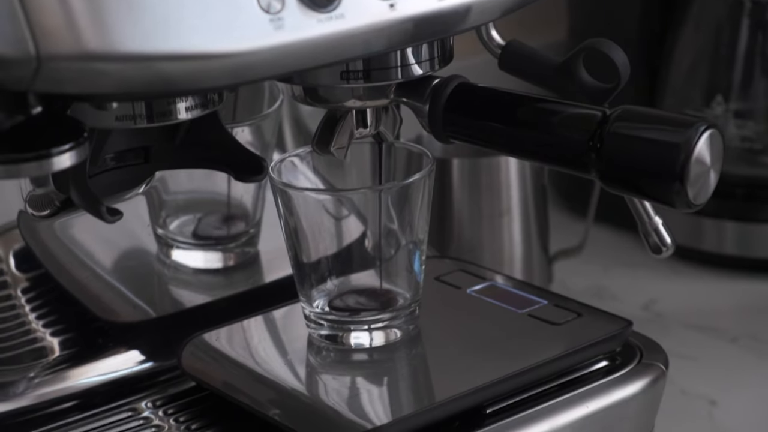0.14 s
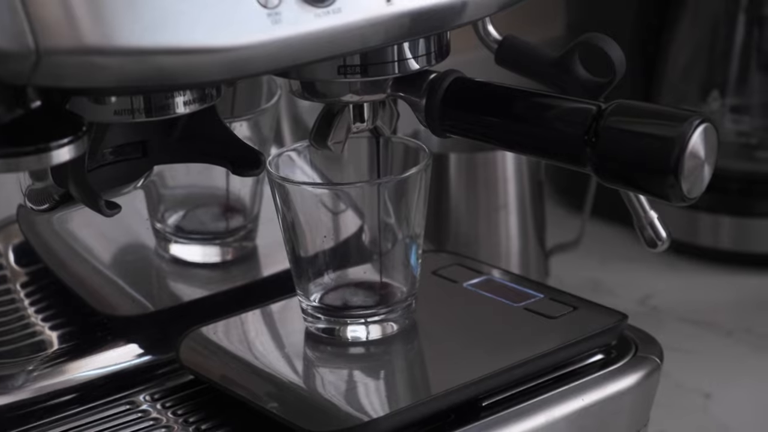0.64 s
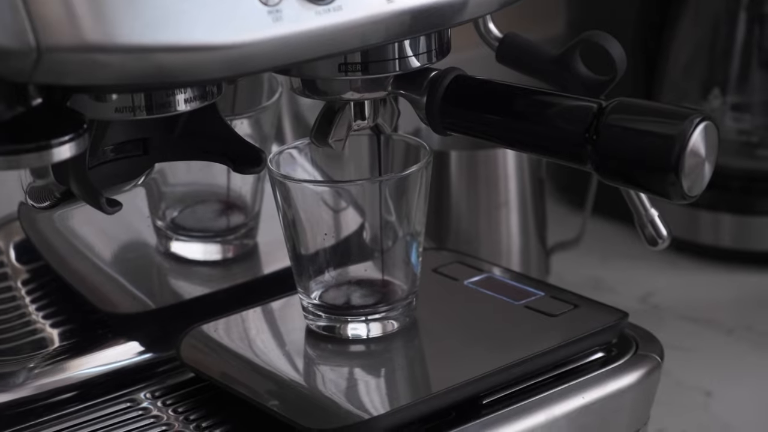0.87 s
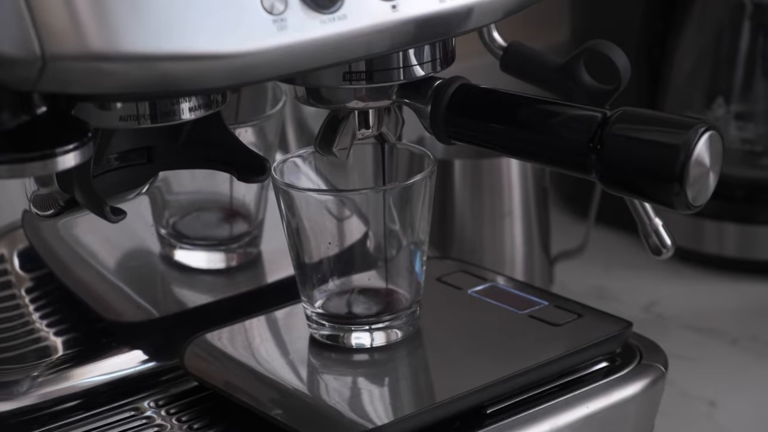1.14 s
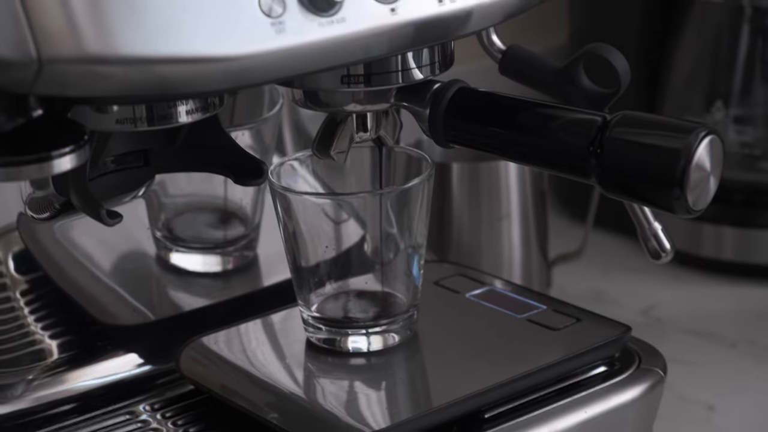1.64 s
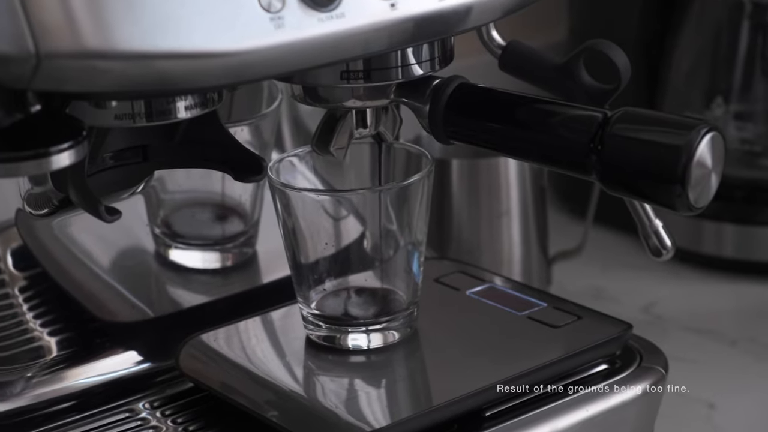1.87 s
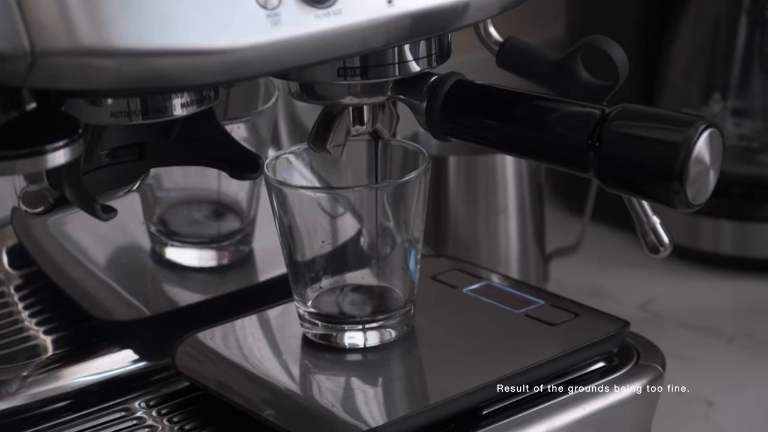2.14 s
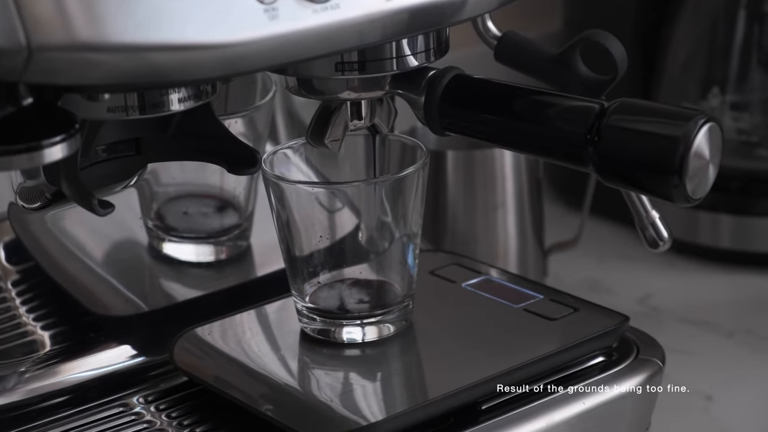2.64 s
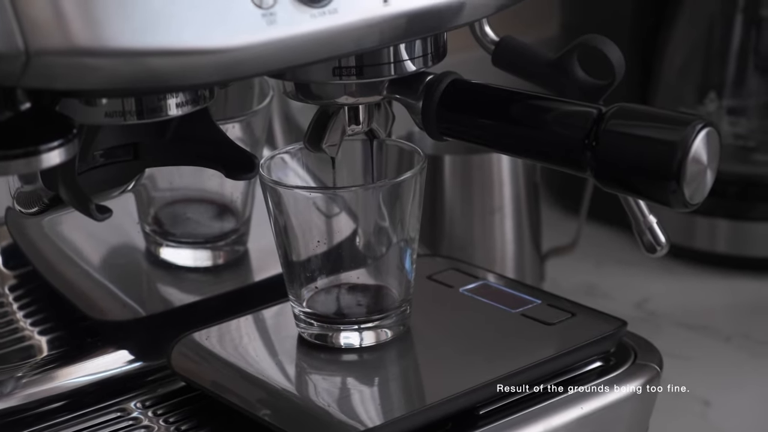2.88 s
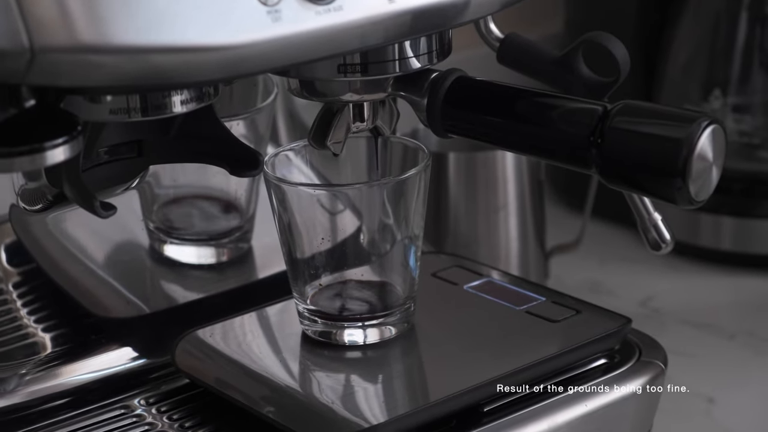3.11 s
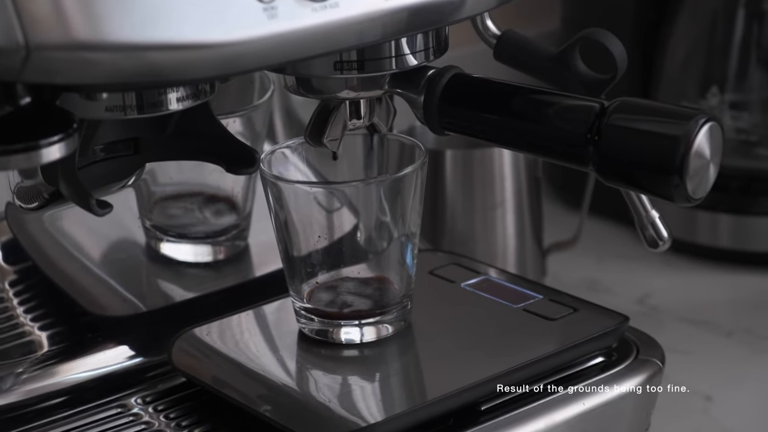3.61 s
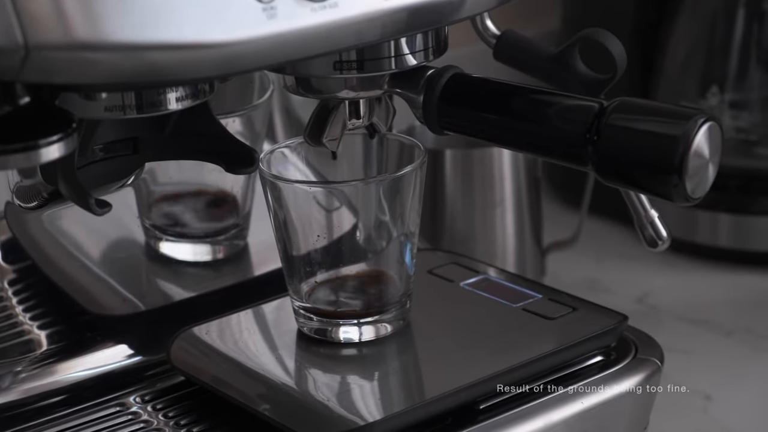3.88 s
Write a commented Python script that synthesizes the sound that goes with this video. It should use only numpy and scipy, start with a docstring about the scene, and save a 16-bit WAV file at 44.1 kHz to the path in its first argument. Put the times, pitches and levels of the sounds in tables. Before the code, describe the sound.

An espresso machine pump buzzes continuously at close range in a kitchen, its metal housing rattling; the tone flickers duller and fuller early, then settles, with faint pulsing hiss and a few glassy drip ticks after two seconds.

```python
"""A buzz at the mains rate: an espresso machine's vibrating pump, strokes ringing the metal housing.
Summed multiples of the stroke rate; early on they flip a few times between a duller and a fuller tone.
Water rushes and hisses: coloured noise, patchy in the middle, its treble puffing with each stroke.
Coffee drips into a glass (rising blips with echoes); brief fizzes (swept noise) climb in the treble.
The machine stands nearer the right microphone."""
import sys
import numpy as np
from scipy import signal
from scipy.fft import rfft, irfft
from scipy.io import wavfile

SR = 44100
rng = np.random.default_rng(int(sys.argv[2]) if len(sys.argv) > 2 else 0)


def boost_factor(decibels):
    """Convert a level in decibels to a linear amplitude factor."""
    exponent = np.asarray(decibels, float) / 20
    return 10 ** exponent


def digitize_waveform(pressure):
    """Quantize a signal to 16-bit integers and store it at the path in sys.argv[1].

    Rows of a 2-D input are taken as channels; values are limited to [-1, 1].
    """
    field = np.atleast_2d(pressure).T
    bounded = np.clip(field, -1, 1)
    quanta = np.round(bounded * 32767).astype(np.int16)
    wavfile.write(sys.argv[1], SR, quanta)


N = 176400

MAINS_HZ = 60.003
STROKE_S = 0.00966  # moment in the cycle when water is pushed

# Buzz fullness, read relative to FULL_REF_DB: (time [s], level [dB])
FULLNESS = [(0.0, -37.5), (0.02, -37), (0.26, -37), (0.29, -33.5), (0.41, -38.5), (0.52, -39), (0.59, -34),
            (0.9, -34), (0.95, -36), (1.0, -37), (1.06, -34), (1.16, -33.5), (1.53, -35), (2.31, -32.5),
            (2.35, -33.5), (3.23, -33), (3.41, -34), (3.92, -33), (4.0, -34.5)]
FULL_REF_DB, DRIFT_MID_S = -34.2, 2.5
# Multiples of the stroke rate; rms levels at FULL_REF_DB and DRIFT_MID_S:
# (multiple, left [dB], right [dB], left phase lead [rad], follow [dB per dB fullness], drift [dB/s])
ORDERS = [(1, -63, -59, 0.3, 0.2, 0.2), (2, -53, -52, -0.1, -0.1, 0.2), (3, -48, -46, -0.2, 0.0, 0.3),
          (4, -54, -55, -0.2, 0.3, 0.2), (5, -49, -47, -0.4, 0.1, 0.1), (6, -40, -42, -0.9, -0.1, 0.4),
          (7, -47, -48, -0.2, 0.2, 0.3), (8, -39, -36, -0.4, -0.2, -0.3), (9, -44, -42, -0.0, 0.1, 0.8),
          (10, -44, -41, -0.1, -0.3, -0.7), (11, -32, -32, -0.1, 1.0, 0.0),
          (12, -49, -51, -1.2, -0.0, -0.2), (13, -50, -51, -0.2, 0.1, 0.5), (14, -61, -61, -0.8, -0.8, 1.1),
          (15, -57, -52, -1.6, -0.1, 0.8), (16, -58, -55, 1.7, 0.6, -0.2), (17, -57, -54, -0.8, 0.2, 0.1),
          (18, -67, -59, 2.1, -1.3, -0.1), (19, -57, -44, -0.3, 0.1, -0.3), (20, -63, -49, -0.3, 1.2, -0.2),
          (21, -62, -51, 0.3, -0.9, 0.3), (22, -52, -47, 0.6, 0.4, 1.5), (23, -63, -65, 0.2, -1.1, 0.4),
          (24, -55, -60, 1.0, 1.0, 0.0), (25, -64, -54, 0.2, -1.0, 0.3), (26, -51, -42, 0.8, 1.1, 0.9),
          (27, -68, -51, 2.6, -0.3, -0.6), (28, -68, -64, 0.4, -0.9, 0.3), (29, -60, -62, -0.4, -0.5, -0.6),
          (30, -54, -54, 0.1, 0.7, -1.2), (31, -60, -60, -0.1, 0.3, -0.2), (32, -71, -64, 2.1, -0.4, 1.3),
          (33, -67, -59, 0.0, 2.0, -0.4), (34, -72, -62, 1.7, 0.5, -0.7), (35, -63, -59, -0.1, 0.4, -0.5),
          (36, -62, -58, -0.6, -0.4, 0.1), (37, -64, -57, -0.4, 0.3, 0.3), (38, -70, -64, 0.6, -0.9, 1.1),
          (39, -66, -65, -1.1, 0.0, 0.4), (40, -64, -68, -1.0, -0.3, -0.1), (41, -69, -79, -1.1, -0.9, 0.3),
          (42, -69, -61, 2.4, 0.2, -0.1), (43, -69, -67, 1.1, -0.4, -1.1), (44, -68, -62, -0.1, 0.4, -0.7),
          (45, -68, -75, 1.9, -0.3, 0.3), (46, -64, -59, -0.3, 1.4, 0.9), (47, -72, -67, 1.9, -0.7, 0.2),
          (48, -69, -69, 2.5, 0.0, 0.3), (49, -71, -65, -1.5, 0.5, -0.1), (50, -69, -69, 1.8, 0.2, -0.5),
          (51, -75, -65, -0.3, 0.9, 0.4), (52, -71, -68, 0.5, 0.1, -0.2), (53, -83, -66, -1.7, 1.3, -0.4),
          (54, -75, -67, -1.7, -0.1, 0.2), (55, -75, -67, 0.8, 0.4, -1.4), (56, -66, -60, 1.0, 0.6, 0.1),
          (57, -67, -74, 0.3, 0.6, -0.3), (58, -66, -62, 0.7, 0.6, 0.3), (59, -78, -70, 1.1, 0.8, -1.7),
          (60, -74, -66, 2.8, 0.6, -0.1), (61, -77, -74, -2.9, -0.4, 1.2), (64, -78, -83, -0.2, 0.0, 0.1),
          (67, -74, -76, -0.8, 0.5, 0.6), (68, -83, -76, -0.2, 0.3, -1.0), (69, -89, -75, -1.6, 0.4, 0.4),
          (71, -81, -78, -1.0, 0.5, 0.2), (72, -78, -78, -0.7, 0.2, -1.8), (73, -76, -66, -0.2, 2.0, -3.0),
          (74, -79, -76, 0.3, 1.0, -1.4), (75, -77, -70, -1.2, 1.0, -1.2), (76, -77, -63, 1.4, 2.3, -2.1),
          (77, -76, -78, -1.9, 1.0, -0.4), (78, -78, -66, 0.2, -0.2, 1.8), (79, -75, -74, 2.9, 1.1, -1.4),
          (80, -80, -86, -0.2, -0.3, -0.3), (81, -76, -70, 2.5, 0.6, 0.5), (82, -77, -79, -0.0, 0.7, 0.7),
          (83, -76, -75, 0.5, 0.7, -0.1), (84, -84, -77, 1.3, 0.7, -0.8), (85, -78, -78, 1.2, -0.7, -0.1),
          (86, -78, -72, 1.1, -0.2, 0.2), (89, -81, -74, 1.2, -0.1, -0.7), (90, -84, -75, -1.2, 0.3, -0.9),
          (92, -86, -75, -2.8, -0.1, -1.2), (94, -76, -74, 1.3, 0.2, -0.5), (96, -74, -73, -0.1, 0.4, -1.2),
          (97, -82, -72, -1.0, 0.1, -0.4), (98, -80, -74, -0.3, 0.4, -0.7), (100, -78, -70, 0.9, 0.8, -0.5),
          (101, -77, -83, 2.6, 0.2, 1.1), (102, -79, -75, -0.3, 0.5, -1.4), (103, -76, -72, -0.2, 0.7, 0.3),
          (104, -80, -71, 1.8, 0.5, -0.6), (106, -82, -79, -0.0, 0.4, 0.6), (108, -85, -77, 2.0, 0.9, -0.9),
          (109, -81, -78, 0.9, 0.2, 0.5), (110, -81, -76, 1.9, 1.3, -1.7), (111, -78, -75, 1.7, 1.5, -2.4),
          (116, -84, -77, 1.7, 0.5, -1.3), (120, -87, -77, 2.4, -0.3, 0.3), (121, -82, -80, 1.9, 0.4, -0.1)]
# Blow and rebound in each cycle, setting the tone phases:
# (from multiple, blow [s], rebound delay [s], rebound gain, turn [rad])
BLOWS = [(1, 0.01058, 0.01022, 0.9, -2.77), (14, 0.00425, 0.00589, 0.9, -2.97),
         (32, 0.01025, 0.00761, -0.8, 1.1), (62, 0.01558, 0.01183, 0.9, -0.42)]
# Random phase offset of the tones: (frequency [Hz], spread [rad])
SCATTER = [(700, .08), (1000, .4), (2000, .9), (3500, 1.1), (7000, 1.1)]
# Wander of the tones: (frequency [Hz], wandering over steady amplitude, wander rate [Hz])
WAVER = [(60, 0.072, 4.2), (240, 0.073, 5.1), (470, 0.027, 2.7), (684, 0.018, 15), (1000, 0.08, 8),
         (1500, 0.12, 8.1), (3000, 0.16, 10), (7000, 0.43, 1.9)]

# Water rush and uneven rattle between the tones: (frequency [Hz], left [dB per Hz], right [dB per Hz])
RUSH_SPECTRUM = [(20, -88, -84.9), (40, -86, -88.0), (80, -83, -78), (112, -84, -108), (125, -76, -72),
                 (140, -70.5, -72), (197, -70, -75), (243, -77, -75), (330, -77.4, -75.5), (476, -72, -82),
                 (553, -72, -76.5), (664, -65, -66.5), (650, -67, -71), (727, -79, -67.5),
                 (800, -85.5, -72), (1000, -73.5, -88), (1100, -91.5, -70), (1210, -84, -84),
                 (1508, -73.5, -68), (1560, -89.5, -70), (1900, -77.5, -86), (2200, -93.5, -75.5),
                 (2580, -82.5, -82.5), (3300, -91.5, -85), (3730, -91.5, -88), (3970, -86, -92.5),
                 (4600, -101.5, -85.5), (5200, -89.5, -88.5), (6240, -95, -88.5), (7240, -94, -91.5),
                 (9600, -100.5, -93), (10800, -102.3, -94), (13000, -103.7, -98.5), (15900, -109.5, -102.2)]
# Left-right likeness of the rush: (frequency [Hz], correlation)
RUSH_LIKENESS = [(20, .85), (80, .5), (135, 1), (260, 0.75), (450, 0.51), (625, 0.59), (950, 0.1),
                 (1500, 0.5), (2200, 0.52), (2600, .2), (15000, .03)]
# Part of the rush that puffs with the strokes: (frequency [Hz], power share)
PULSED = [(2500, 0.039), (4000, 0.17), (7000, 0.33), (9000, 0.3), (15000, 0.22)]
# Part of the unpulsed rush that comes in rattling patches: (frequency [Hz], power share)
PATCHY = [(400, .05), (630, .6), (900, .6), (1500, 0.86), (2200, 0.54), (3500, 0.12)]
PATCH_DB, PATCH_HZ, PATCH_FOLLOW_DB_PER_DB = 2.3, 9, .8
# Gain of the puffing hiss, read relative to TREBLE_REF_DB: (time [s], level [dB])
TREBLE = [(0.0, -69), (0.05, -67), (0.07, -68), (0.15, -69), (0.28, -55), (0.32, -60.5), (0.91, -58.5),
          (0.92, -58), (1.07, -59.5), (3.41, -59.5), (3.98, -57.5), (4.0, -57)]
TREBLE_REF_DB = -60
PUFF_SPREAD_DB, SWELL_DB, SWELL_HZ = 1.5, 1.0, 4
PUFF_EARLY_S, PUFF_RISE_S, PUFF_FALL_S = 0.0022, 0.00067, 0.0047

# Drops landing in the glass; level before pan and envelope:
# (time [s], level [dB], start pitch [Hz], rise per ring time [octaves], ring to -14 dB [s])
DRIPS = [(2.0193, -45, 3900, .25, .005), (2.2548, -35.5, 5000, .15, .0022), (2.2595, -39, 4800, .6, .002),
         (2.274, -46, 5000, .02, .007), (2.5785, -36, 3950, .7, .004)]
DRIP_LEFT_OVER_RIGHT_DB, DRIP_TAIL_DB, DRIP_TAIL_30DB_S = -4.5, -1.5, .055
# Rising treble fizzes; level before pan and envelope:
# (time [s], length [s], level [dB], start centre [Hz], end centre [Hz])
FIZZES = [(0.06, .06, -54.5, 8500, 14500), (.24, .07, -64, 8000, 11500), (.54, .05, -65, 8000, 10000),
          (.88, .04, -64, 10000, 13000), (1.02, .08, -62, 8500, 10000), (1.38, .04, -63, 9500, 11500),
          (1.81, .03, -60, 8500, 10000), (2.67, .05, -63, 10500, 14500), (3.06, .07, -62, 10000, 13000)]
FIZZ_POLE_WIDTH_HZ, FIZZ_LEFT_OVER_RIGHT_DB = 2800, -6


def pump():
    """Mains-locked multiples of the stroke rate; blow-rebound interference sets phase, each tone wavers."""
    orders, left_db, right_db, lead_rad, follow, drift = np.array(ORDERS, float).T
    hz, t, steps_hz = orders * MAINS_HZ, np.arange(N) / SR, 200
    waver = slow(len(hz), steps_hz, read(WAVER, hz, axis=2))
    step_s = np.arange(waver.shape[1]) / steps_hz
    share = read(WAVER, hz)[:, None]
    level_db = np.outer(follow, fullness_db(step_s)) + np.outer(drift, step_s - DRIFT_MID_S)
    shape = boost_factor(level_db) * (1 + share * waver) / np.sqrt(1 + share ** 2)

    blows = np.array(BLOWS)
    row_of_tone = np.searchsorted(blows[:, 0], orders, "right") - 1
    _, blow_s, delay_s, gain, turn_rad = blows[row_of_tone].T
    rebound = gain * np.exp(-2j * np.pi * hz * delay_s)
    phase = turn_rad - 2 * np.pi * hz * blow_s + np.angle(1 + rebound)
    phase = phase + read(SCATTER, hz) * rng.standard_normal(len(hz))

    level = np.sqrt(2) * boost_factor(np.c_[left_db, right_db])  # rms to peak
    weight = level * np.exp(1j * np.c_[phase + lead_rad, phase])
    out = np.zeros((2, N))
    for f, row, w in zip(hz, shape, weight):
        tone = np.interp(t, step_s, row) * np.exp(2j * np.pi * f * t)
        out += w.real[:, None] * tone.real - w.imag[:, None] * tone.imag
    return out


def stroke_puffs():
    """Gain of the treble rush: a fast rise and exponential fall per stroke, uneven in size, slowly swelling."""
    t = np.arange(N) / SR
    cycles = (t - STROKE_S + PUFF_EARLY_S) * MAINS_HZ + 1
    since_s = cycles % 1 / MAINS_HZ
    sizes = boost_factor(PUFF_SPREAD_DB * rng.standard_normal(int(cycles[-1]) + 2))[cycles.astype(int)]
    puff = evened(sizes * (1 - np.exp(-since_s / PUFF_RISE_S)) * np.exp(-since_s / PUFF_FALL_S))
    treble_db = np.interp(t, *np.transpose(TREBLE)) - TREBLE_REF_DB
    return puff * swelling(SWELL_DB, SWELL_HZ) * boost_factor(treble_db)


def rush():
    """Coloured noise: a steady part, a patchy rattle following the fullness, and a part puffing per stroke."""
    t, hz = np.arange(N) / SR, np.fft.rfftfreq(N, 1 / SR)
    puff = stroke_puffs()
    patch = swelling(PATCH_DB, PATCH_HZ) * boost_factor(PATCH_FOLLOW_DB_PER_DB * fullness_db(t))
    steady, rattle, hiss = rng.standard_normal((3, 2, N))
    pulsed, patchy = np.clip(read(PULSED, hz), 0, 1), np.clip(read(PATCHY, hz), 0, 1)
    unpulsed = np.sqrt(1 - patchy) * rfft(steady) + np.sqrt(patchy) * rfft(rattle * patch)
    a, b = np.sqrt(1 - pulsed) * unpulsed + np.sqrt(pulsed) * rfft(hiss * puff)

    same = np.clip(read(RUSH_LIKENESS, hz), -1, 1)
    stereo = np.array([a, same * a + np.sqrt(1 - same ** 2) * b])
    colour_db = np.array([read(RUSH_SPECTRUM, hz, axis=1), read(RUSH_SPECTRUM, hz, axis=2)])
    return irfft(boost_factor(colour_db) * np.sqrt(SR / 2) * stereo, N)


def drip(level_db, start_hz, rise_oct, ring_s):
    """A small bubble whose pitch climbs as it dies, then its scattered echo in glass and room."""
    t = np.arange(0, 3 * ring_s, 1 / SR)
    hz = start_hz * 2 ** (rise_oct * np.minimum(t / ring_s, 1.5))
    envelope = (1 - np.exp(-t / 0.0004)) * boost_factor(-14 * (t / ring_s) ** 2)
    blip = np.sin(2 * np.pi * np.cumsum(hz) / SR) * envelope
    u = np.arange(4410) / SR
    echo = rng.standard_normal((2, len(u))) * boost_factor(-30 * u / DRIP_TAIL_30DB_S) * (u > .002)
    echo *= boost_factor(DRIP_TAIL_DB) / np.linalg.norm(echo, axis=1, keepdims=True)
    echo[:, 0] = 1  # direct sound
    gain = boost_factor(level_db + DRIP_LEFT_OVER_RIGHT_DB * np.array([[.5], [-.5]]))
    return gain * signal.fftconvolve(blip[None], echo, axes=1)


def fizz(length_s, level_db, start_hz, end_hz):
    """A narrow noise band, two-pole filtered and shifted upward in frequency, under a sine arch."""
    u = np.linspace(0, 1, round(length_s * SR))
    r = np.exp(-np.pi * FIZZ_POLE_WIDTH_HZ / SR)
    noise = rng.standard_normal((2, 8820)) + 1j * rng.standard_normal((2, 8820))
    band = signal.lfilter([1], np.convolve([1, -r], [1, -r]), noise)[:, :len(u)]
    centre_hz = start_hz + (end_hz - start_hz) * u
    sweep = (band * np.exp(2j * np.pi * np.cumsum(centre_hz) / SR)).real
    gain = boost_factor(level_db + FIZZ_LEFT_OVER_RIGHT_DB * np.array([[.5], [-.5]]))
    return gain * evened(sweep) * np.sin(np.pi * u ** 0.54)


def fullness_db(t):
    """Buzz fullness at times t [s], relative to FULL_REF_DB."""
    return np.interp(t, *np.transpose(FULLNESS)) - FULL_REF_DB


def swelling(depth_db, top_hz):
    """A slow random gain of rms 1."""
    steps_hz = 100
    v = slow(1, steps_hz, top_hz)[0].real
    drift = np.interp(np.arange(N) / SR, np.arange(len(v)) / steps_hz, v)
    return evened(boost_factor(depth_db * np.sqrt(2) * drift))


def slow(count, steps_hz, top_hz):
    """Rows of complex noise rolled off above top_hz, rms 1, sampled steps_hz times a second."""
    size = int(N / SR * steps_hz) + 2
    hz = np.fft.fftfreq(size, 1 / steps_hz)
    z = rng.standard_normal((count, size)) + 1j * rng.standard_normal((count, size))
    return evened(np.fft.ifft(z / (1 + (hz / np.reshape(top_hz, (-1, 1))) ** 2)))


def evened(x):
    """Scales to rms 1."""
    return x / np.sqrt(np.mean(abs(x) ** 2, axis=-1, keepdims=True) + 1e-20)


def read(points, hz, axis=1):
    """Reads a spectrum column on a log-frequency axis."""
    table = np.array(points, float)
    return np.interp(np.log(hz + 1), np.log(table[:, 0] + 1), table[:, axis])


def add(mix, start_s, sound):
    """Mixes a stereo sound in at start_s."""
    part = mix[:, round(start_s * SR):][:, :sound.shape[1]]
    part += sound[:, :part.shape[1]]


def scene():
    """Pump, rush, drips and fizzes."""
    mix = pump() + rush()
    for start_s, *row in DRIPS:
        add(mix, start_s, drip(*row))
    for start_s, *row in FIZZES:
        add(mix, start_s, fizz(*row))
    return mix


def band_limit(x):
    """A steep low-pass at the top of the band."""
    return signal.sosfilt(signal.butter(12, 15630, fs=SR, output="sos"), x)


def record(dry):
    """Delivers the finished stereo mix."""
    return band_limit(dry)


dry = scene()
out = record(dry)
digitize_waveform(out)
```